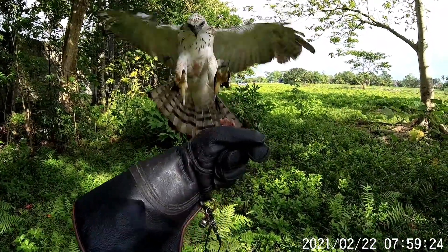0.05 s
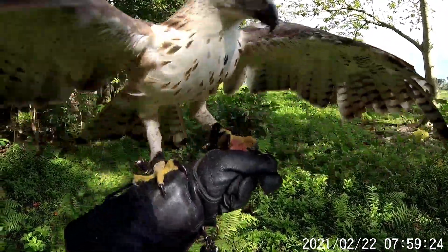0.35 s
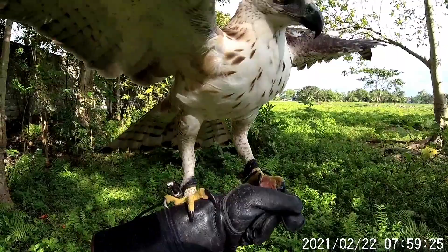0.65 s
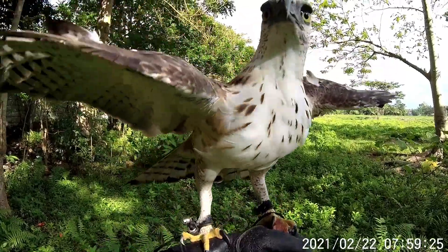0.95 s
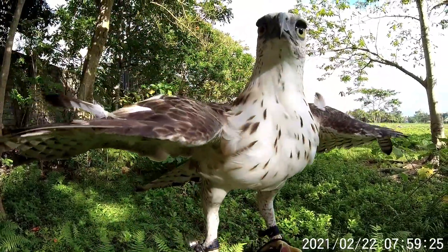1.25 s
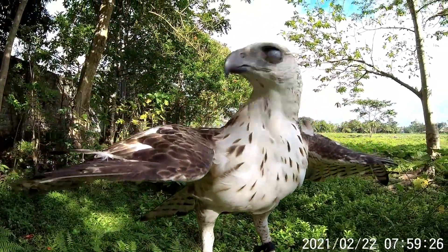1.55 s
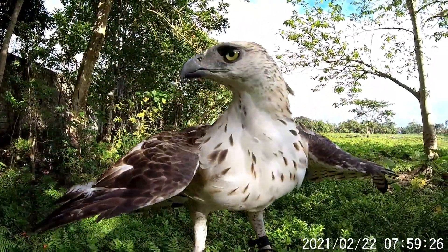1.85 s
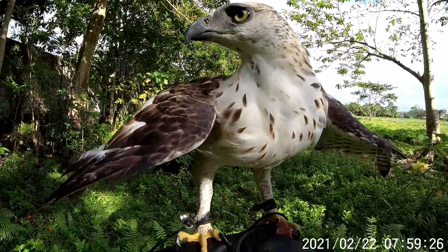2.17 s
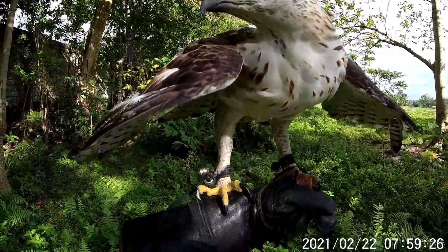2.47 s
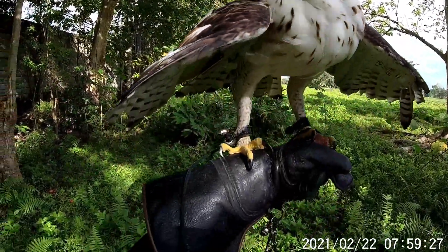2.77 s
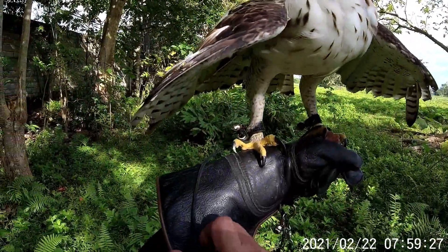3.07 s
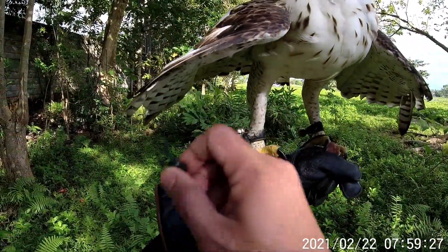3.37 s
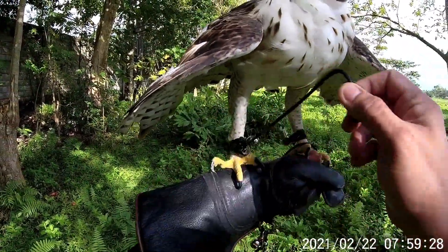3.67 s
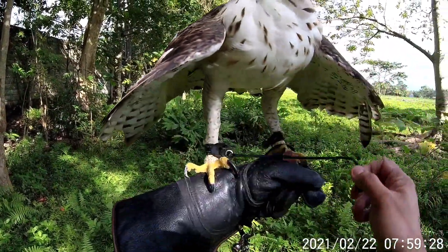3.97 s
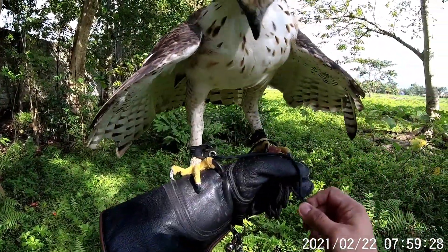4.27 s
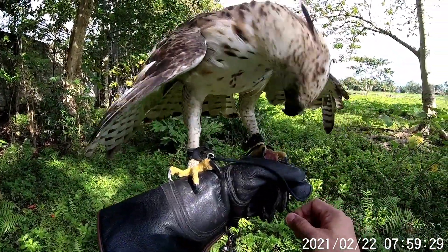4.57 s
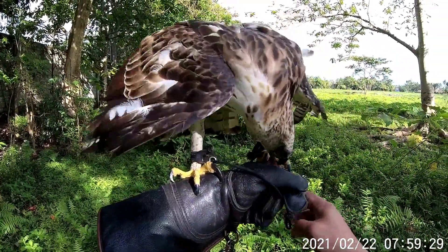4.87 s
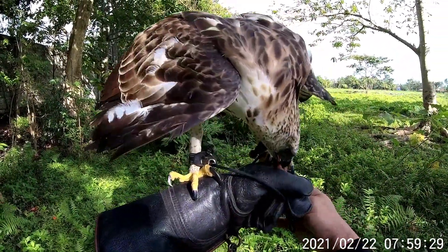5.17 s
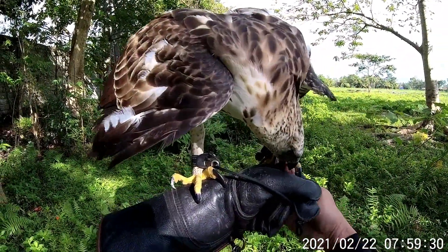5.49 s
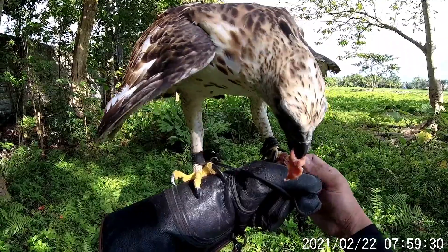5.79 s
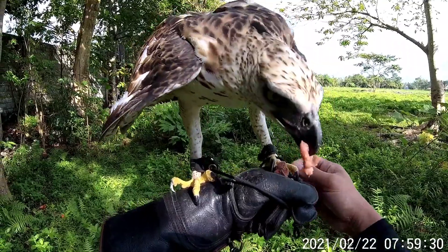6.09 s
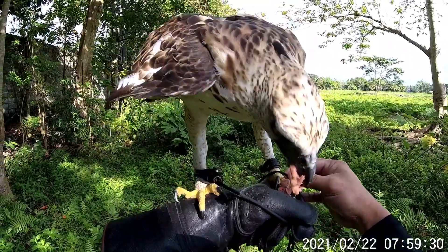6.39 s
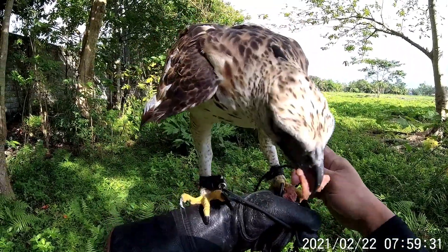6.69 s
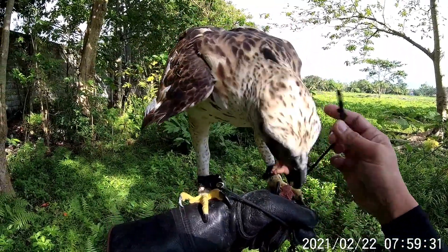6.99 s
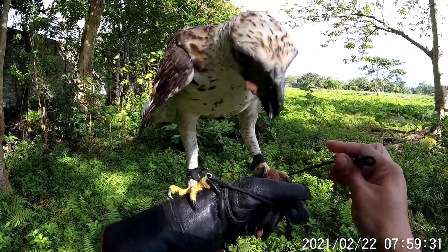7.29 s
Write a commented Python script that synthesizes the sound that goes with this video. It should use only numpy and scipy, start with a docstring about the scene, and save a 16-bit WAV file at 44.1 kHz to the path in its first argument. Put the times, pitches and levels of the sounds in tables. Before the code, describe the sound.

Small, high leg bells chatter close by from the start as an eagle lands on a leather glove. Feathers rustle, its feet make a quick cluster of dull, hollow knocks at about 0.2 seconds, and metal leash fittings clink. The jangling thins out by 1 second into sparse, soft ticks. A very faint, distant rooster crows from 0.6 to 1.8 seconds, and a songbird chips near 1.2 and 1.9. From about 3.1 to 4.3 seconds the bells jingle brightly again as the bird shifts its feet. Four faint, distant whistles follow between 4.1 and 5 seconds. From 5 to 7 seconds the beak gives a few small, sharp clicks as it takes food, with light swivel clinks and a soft shake of a bell. Throughout, distant engines drone low over the quiet field, with soft microphone hiss and a thin, high whine.

```python
"""Small bells chatter on a hawk-eagle's legs as it lands on a falconer's glove and shifts its feet.
Each blow of a loose clapper excites the modes of a metal shell, which then decay freely.
Feathers rustle, feet knock on the glove, a leash swivel clinks and the beak clicks as it takes food.
Songbirds and a rooster call far off, their sound scattered by trees, over the drone of engines.
The microphone adds hiss and a thin whine."""
import sys
import numpy as np
from scipy import signal
from scipy.fft import rfft, irfft, next_fast_len
from scipy.io import wavfile

SR = 44100
rng = np.random.default_rng(int(sys.argv[2]) if len(sys.argv) > 2 else 0)


def transcribe(u):
    """Save the signal u as a 16-bit wav file named by the first command-line argument.

    u: samples, shape (n,) or (channels, n), limited to [-1, 1]; the rate is SR.
    q: integer samples, one column per channel.
    """
    v = np.clip(np.atleast_2d(u).T, -1, 1)
    q = np.round(v * 32767).astype(np.int16)
    wavfile.write(sys.argv[1], SR, q)


N = 323694
T = np.arange(N) / SR

TWIN_HZ = (3950, 4099)  # the high bell's split main mode
# feet and wings striking the glove: (time [s], level [dB])
KNOCKS = [(0.182, -26), (0.19, -25), (0.198, -16), (0.202, -37), (0.221, -25), (0.456, -32.5), (0.723, -49)]


def amp(db):
    """Amplitude grows tenfold every 20 dB."""
    return 10 ** (np.asarray(db) / 20)


def unit_rms(x):
    """Normalisation to unit power."""
    return x / np.sqrt(np.mean(x ** 2) + 1e-20)


def curves(rows):
    """Linear interpolation of each column over time."""
    s, *columns = np.transpose(rows)
    return [np.interp(T, s, c) for c in columns]


def add(mix, s, sound):
    """Superposition: a sound joins the mix at time s."""
    part = mix[max(round(s * SR), 0):][:len(sound)]
    part += sound[:len(part)]


def noise(colour, size=N):
    """Spectral shaping: white noise takes a colour (frequency [Hz], level [dB]), at unit power."""
    hz, db = np.transpose(colour)
    f = np.fft.rfftfreq(size, 1 / SR) + 1
    gain = amp(np.interp(np.log(f), np.log(hz), db)) * np.minimum(f / hz[0], 1) ** 2
    return unit_rms(irfft(rfft(rng.standard_normal(size)) * gain, size))


def drift(rate_hz):
    """Random modulation: low-pass noise of unit power."""
    size = next_fast_len(N, real=True)
    f = np.fft.rfftfreq(size, 1 / SR)
    return unit_rms(irfft(rfft(rng.standard_normal(size)) * np.exp(-(f / rate_hz) ** 2), size)[:N])


def ring(times, db, t60, hz, bend, settle, rise):
    """A damped mode restarted by each strike; contact stiffness makes its pitch start sharp."""
    order = np.argsort(times)
    last = order[np.maximum(np.searchsorted(times[order], T, side="right") - 1, 0)]
    age = np.maximum(T - times[last], 0)  # since the latest strike
    level = amp(db[last] - 60 * age / t60) * (age > 0)
    pole = np.exp(-1 / (rise * SR))
    level = signal.lfilter([1 - pole], [1, -pole], level)
    sharp = (bend * rng.uniform(0.45, 1.5, len(times)))[last] * np.exp(-age / settle)
    return level * np.sin(2 * np.pi * (np.cumsum(hz * (1 + sharp)) / SR + rng.random()))


def chime(times, db, t60, hz, detune, rise=0.00049, size=8192):
    """Superposed decays of one mode, each in its own phase and slightly off pitch."""
    out, t = np.zeros(N), np.arange(size) / SR
    shape = amp(-60 * t / t60) * (1 - np.exp(-t / rise))
    for s, level, (off, phase) in zip(times, amp(db), rng.uniform(-0.89, 1, (len(times), 2))):
        add(out, s, level * shape * np.sin(2 * np.pi * (hz * (1 + detune * off) * t + phase)))
    return out


def bursts(blows, colour, t60, rise, size=4096):
    """Brief impacts have broad spectra: each gives a decaying puff of noise."""
    out, t = np.zeros(N), np.arange(size) / SR
    for s, db in blows:
        puff = noise(colour, size) * amp(-60 * t / t60) * (1 - np.exp(-t / rise))
        add(out, s, amp(db) * puff / abs(puff).max())
    return out


def rattle(bouts, gap_s, spread_db, count=1200):
    """A jittered impulse train: times and levels of a clapper's bounces in each bout."""
    jitter, luck = rng.uniform(-0.99, 1, (count, 2)).T
    times = gap_s * (np.arange(count) + jitter)
    inside = [(times >= start) & (times <= end) for start, end, _ in bouts]
    return (np.concatenate([times[i] for i in inside]),
            np.concatenate([db + spread_db * luck[i] for i, (*_, db) in zip(inside, bouts)]))


def trees(x, t60):
    """Scattering from trunks and leaves returns sparse, decaying echoes."""
    t = np.arange(SR // 2) / SR
    taps = rng.standard_normal(len(t)) * (rng.random(len(t)) < .05) * amp(-60 * t / t60) * (t > .004)
    return signal.fftconvolve(x, taps / np.linalg.norm(taps))[:N]


def background(hiss_db=-56.5, whine_hz=7607, whine_db=-59):
    """The noise floor: traffic rumble, the wash of the field and microphone self-noise add in power."""
    # spectra: (frequency [Hz], level [dB])
    rumble_colour = [(15, -36), (25, -31.5), (43, -12), (75, -1.5), (91, -4), (141, 0), (196, -4),
                     (246, -8), (333, -9.5), (414, -22.5), (520, -24), (680, -40), (1140, -120)]
    air_colour = [(200, 6), (450, -1.5), (800, -1), (1250, 0), (2000, -4), (3000, -9.5), (4500, -18),
                  (7000, -20), (11000, -45), (11800, -41)]
    hiss_colour = [(4000, -8.5), (7300, -13.5), (8000, -2.5), (8600, 2.5), (9400, -7.5), (11000, -9.5),
                   (11600, -30.5), (14500, -42)]
    # slow swells: (time [s], level [dB])
    rumble_swell = [(0, -39.5), (1.7, -40.5), (3.6, -41), (5.2, -37), (5.8, -39.5), (7.34, -40)]
    air_swell = [(0, -47.5), (1.5, -49.5), (2.2, -49.5), (3.5, -48.5), (4.7, -47), (5.7, -48.5),
                 (7.34, -47)]
    rumble = noise(rumble_colour) * amp(curves(rumble_swell)[0] - 1 + 1.5 * drift(3.8))
    air = noise(air_colour) * amp(curves(air_swell)[0] + 0.36 * drift(5.4))
    whine = amp(whine_db) * np.sqrt(2) * np.sin(2 * np.pi * whine_hz * T)
    return rumble + air + amp(hiss_db) * noise(hiss_colour) + whine


def engine(running, orders, waver=0.55, flutter_db=2):
    """Harmonics of an engine's cycle waver in level and phase as they cross the field."""
    hz, db = curves(running)
    phase = 2 * np.pi * np.cumsum(hz) / SR
    return np.sqrt(2) * sum(amp(db + order_db + flutter_db * drift(6))
                            * np.sin(k * phase + waver * drift(1.7)) for k, order_db in orders)


def traffic(engine_db=-2, tone_db=-1.5, fade_s=.15):
    """Periodic sources give line spectra: one engine idles, one throttles down, vehicles pass."""
    # engine speeds: (time [s], cycle rate [Hz], level [dB])
    idling = [(0, 47.6, -60), (.6, 47.57, -48), (1.5, 48, -46), (2.4, 48.64, -44), (3.6, 50.57, -42),
              (4.8, 48.86, -43), (6, 49.45, -45.5), (7, 50.93, -42), (7.34, 50.8, -49)]
    pulling = [(0, 31.73, -41), (.4, 31.84, -40), (1.1, 31.92, -39), (1.7, 32.1, -47), (2.35, 32.37, -42),
               (2.95, 32.46, -42.5), (3.2, 32.07, -49.5), (4, 29.8, -85)]
    # their harmonics: (order, level [dB])
    idling_orders = [(1, 0), (2, -0.5), (3, -2.5), (4, -9.5)]
    pulling_orders = [(5, -8.5), (6, 0.5), (7, -13.5), (10, -10.5), (11, -11.5), (12, -16.5)]
    # passing vehicles: (frequency [Hz], level [dB], start [s], end [s])
    drones = [(121.8, -41, 3.3, 3.96), (254, -47, 3.98, 4.03), (146, -37.5, 4.49, 4.95),
              (173.4, -43, 5.05, 5.63), (297, -51.5, 4.94, 5.37), (324, -49.5, 5, 5.4),
              (167, -41.5, 6.1, 6.2), (136.4, -42.5, 6.5, 8.1)]
    tones = np.zeros(N)
    for hz, db, start, end in drones:
        swell = np.clip(np.minimum(T - start, end - T) / fade_s + 1, 0, 1)
        tones += amp(db + 2 * drift(6.7)) * swell * np.sin(2 * np.pi * hz * T + 0.92 * drift(4.7))
    engines = engine(idling, idling_orders) + engine(pulling, pulling_orders)
    return amp(engine_db) * engines + amp(tone_db) * np.sqrt(2) * tones


def rooster(roughness=.045):
    """Pitch jitter makes the crow hoarse; only two harmonics carry across the field."""
    # (time [s], fundamental [Hz], level [dB])
    crow = [(.6, 612, -75), (.7, 600, -50), (.85, 627, -60), (1.05, 636.4, -52), (1.2, 657, -55),
            (1.3, 592, -50), (1.45, 559, -54), (1.65, 545, -55), (1.85, 560, -75)]
    hz, db = curves(crow)
    phase = 2 * np.pi * np.cumsum(hz * (1 + roughness * drift(60.4))) / SR
    sounding = (T > crow[0][0]) & (T < crow[-1][0])
    return sounding * amp(db) * (amp(-1) * np.sin(2 * phase) + amp(-4) * np.sin(3 * phase))


def birdsong(notes, contour, waver):
    """Frequency and amplitude modulation bend each pure note along one contour."""
    age, ratio, shape_db = np.transpose(contour)
    t, out = np.arange(0, age[-1], 1 / SR), np.zeros(N)
    wobble, flutter = drift(160), drift(70)
    taper = signal.windows.tukey(len(t), .15)
    for s, db, hz in notes:
        span = slice(round(s * SR), round(s * SR) + len(t))
        pitch = hz * np.interp(t, age, ratio) * (1 + waver * wobble[span])
        level = amp(db + np.interp(t, age, shape_db) + 2 * flutter[span]) * taper
        add(out, s, level * np.sin(2 * np.pi * np.cumsum(pitch) / SR))
    return out


def songbirds():
    """Arched whistles and falling chips from two birds arrive by direct and scattered paths."""
    # notes: (time [s], level [dB], reference pitch [Hz])
    whistle_notes = [(4.114, -51, 3400), (4.370, -44.5, 3340), (4.627, -44, 3350), (4.903, -46.5, 3310)]
    chip_notes = [(1.178, -40, 4000), (1.85, -45.5, 4056)]
    # contours: (time into the note [s], pitch ratio, level [dB])
    arch = [(0, .7, -5), (.01, .81, 2), (.02, .9, -1), (.031, 1, -8), (.041, .88, -1), (.052, .71, 1),
            (.064, .66, -2), (.078, .64, -8)]
    fall = [(0, 0.96, 5), (.008, 0.94, -2.5), (0.021, .925, -6), (.04, 0.93, 0)]
    whistles = amp(-0.5) * birdsong(whistle_notes, arch, waver=.03)
    chips = birdsong(chip_notes, fall, waver=0.0097)
    return whistles + amp(0.5) * chips + trees(whistles + chips, t60=0.36)


def beak(level_db=7):
    """Short, hard contacts of the beak give broadband clicks."""
    # (time [s], level [dB])
    clicks = [(5.083, -39), (5.2788, -39), (5.4134, -39), (5.959, -47), (6.6278, -36), (6.9914, -45)]
    # (frequency [Hz], level [dB])
    colour = [(1500, -31), (3500, -4), (5200, 6.5), (7000, 2), (10000, -17), (14500, -20)]
    return amp(level_db) * bursts(clicks, colour, t60=0.0065, rise=.0001)


def wing_effort(rise_s=0.0052, fade_db_per_s=190):
    """The envelope of the wing beats: each rises quickly, holds and decays exponentially."""
    # (time [s], duration [s], level [dB])
    beats = [(0, .015, -48), (.1, 0.079, -48), (0.183, .18, -41.5), (0.434, 0.088, -50), (0.598, .03, -53)]
    return sum(amp(db - fade_db_per_s * np.maximum(T - s - length, 0)) * np.clip((T - s) / rise_s, 0, 1)
               for s, length, db in beats)


def landing(rustle_db=2, scrape_db=-27, knock_db=-0.5):
    """Friction and impact: feathers rustle, talons scrape and the padded glove takes dull knocks."""
    # spectra: (frequency [Hz], level [dB])
    rustle_colour = [(300, 2), (900, 1), (1800, -17), (3600, 11.5), (6000, 1.5), (9000, -6.5), (13000, -3),
                     (14500, -26)]
    knock_colour = [(150, -10), (450, -15.5), (690, 4.5), (850, -11.5), (1100, -7), (1500, -19),
                    (2200, -13.5), (5000, -41)]
    scrape_colour = [(2200, -29), (2700, 0.5), (3300, -7), (3800, -3), (4300, -5), (5000, -34)]
    rustle = noise(rustle_colour) * amp(rustle_db + 3 * drift(120)) * wing_effort()
    grip = np.interp(T, [.192, .198, .228, .25], [0.007, 1, 0.71, 0.0013])
    scrape = noise(scrape_colour) * amp(scrape_db + 3 * drift(200)) * grip
    return rustle + scrape + amp(knock_db) * bursts(KNOCKS, knock_colour, t60=0.046, rise=.0016)


def glove(level_db=-10, growth=1.6):
    """A damped resonance of the gloved fist answers the harder knocks with a hollow note."""
    s, db = np.transpose(KNOCKS)
    note_db = db.max() + growth * (db - db.max()) + level_db
    return ring(s, note_db, t60=0.039, hz=700, bend=0.044, settle=0.0021, rise=0.0013)


def fittings(level_db=2.5, spread_db=4, count=9):
    """Random collisions excite rings and buckles at the landing, as hard as the wings beat."""
    # (frequency [Hz], level [dB], t60 [s])
    modes = [(5830, -3, .05), (6670, 0, 0.079), (9520, -2.5, .07), (10300, 4, 0.055), (12380, 5, .05),
             (12800, 1, .08), (14260, -3, .06)]
    out, effort_db = np.zeros(N), 20 * np.log10(wing_effort() + 1e-9)
    for hz, db, t60 in modes:
        times = rng.uniform(.18, .42, count)
        clash_db = np.interp(times, T, effort_db) + level_db + db + spread_db * rng.uniform(-1, 1, count)
        out += chime(times, clash_db, t60, hz, detune=0.0052)
    return out


def swivel(level_db=-3.5, t60=0.037):
    """Each clink of the leash swivel, and its weakening rebounds, excites inharmonic modes."""
    # (time [s], level [dB])
    clinks = [(.3472, -9.5), (0.3564, -8.5), (.3654, -12), (0.38, -19), (0.3908, -26), (0.4372, -35),
              (.4518, -31), (.5302, -27), (.6128, -21.5), (0.6228, -23.5), (.6364, -31), (1.8009, -44),
              (2.5381, -43), (5.3398, -43), (5.805, -23.5), (5.8481, -46), (6.0847, -43), (6.1623, -26.5),
              (6.573, -25.5), (6.975, -31)]
    # (delay [s], level [dB])
    bounces = [(0, 3), (.004, -5.5), (.008, -13), (0.014, -22)]
    # (frequency [Hz], level [dB], factor on t60)
    modes = [(4812, 0, 1), (5150, -14, .6), (9600, -29, 1), (12350, -23, .8)]
    s, db = np.transpose(clinks)
    delay, bounce_db = np.transpose(bounces)
    times = (s[:, None] + delay * rng.uniform(0.96, 1.2, (len(s), 1))).ravel()
    hit_db = (db[:, None] + bounce_db + level_db).ravel()
    pull = 1 + .014 * np.interp(T, [.4, .7], [0, 1]) * (1 + .7 * drift(19.8))  # taut leash raises pitch
    ringing = sum(ring(times, hit_db + mode_db, t60 * factor, hz * pull,
                       bend=0.013, settle=0.000715, rise=0.00033) for hz, mode_db, factor in modes)
    tick_db = hit_db - 5 + 3 * rng.standard_normal(len(times))
    return ringing + ring(times, tick_db, t60=0.0053, hz=5080, bend=.08, settle=.001, rise=0.00018)


def low_bell(level_db=-1, brightening=0.12, singing_hz=3204):
    """Modal excitation varies: each strike on the larger bell favours other modes; soft ones are dull."""
    # (time [s], level [dB], level of the singing mode [dB])
    strikes = [(0.197, -16.5, -33), (.201, -21.5, -45), (0.224, -28, -36), (.2334, -33, -50),
               (0.243, -24, -50), (0.296, -41, -27), (0.3558, -27, -38), (.368, -33, -28.5),
               (.4529, -33, -45), (0.466, -33, -55), (5.761, -42.5, -75), (6.0222, -48, -75),
               (6.0736, -42.5, -75)]
    # shaking from the landing and from tugging at food: (start [s], end [s], level [dB])
    rolls = [(.055, .11, -38), (.27, .41, -35), (.48, .53, -39), (5.66, 5.78, -53), (5.92, 6.1, -54),
             (6.82, 6.86, -56)]
    # (frequency [Hz], level [dB], t60 [s])
    modes = [(2787, -8.5, 0.17), (2885, -3, 0.13), (3700, -6.5, 0.064), (6520, -17, 0.12),
             (7380, -19, 0.16), (10400, -29, .08), (12000, -16, 0.05), (12430, -9, .05), (12800, -14, .09),
             (14130, -24, .07)]
    clear_s, clear_db, singing_db = np.transpose(strikes)
    s, db = np.hstack([(clear_s, clear_db), rattle(rolls, gap_s=0.025, spread_db=3)])
    tilt = brightening * np.log([hz / modes[0][0] for hz, *_ in modes])
    colour_db = 3 * rng.standard_normal((len(s), len(modes))) + np.outer(db - db.max(), tilt)
    jangle = sum(chime(s, db + level_db + mode_db + offset_db, t60, hz, detune=0.0078, rise=0.0005)
                 for (hz, mode_db, t60), offset_db in zip(modes, colour_db.T))
    return jangle + chime(clear_s, singing_db, t60=0.17, hz=singing_hz, detune=.001, rise=.0019)


def sheen_overtones(s, db, growth=0.89, firm_strike_db=-20):
    """Weak shell modes give the high bell a thin, high shimmer, which follows the strike's force."""
    # (frequency [Hz], level at a firm strike [dB], t60 [s])
    modes = [(10436, -49.5, 0.16), (13800, -73, .046)]
    luck_db = 3 * rng.standard_normal((len(s), len(modes)))
    return sum(chime(s, mode_db + growth * (db - firm_strike_db) + luck, t60, hz, detune=0.0013)
               for (hz, mode_db, t60), luck in zip(modes, luck_db.T))


def rolling_clapper(twin_db=-11, overtone_db=-12):
    """Rolling contact ticks on the high bell's shell; the gentler the motion, the fewer the ticks."""
    # the bird shifts its weight: (start [s], end [s], level [dB])
    rolls = [(.015, .035, -24), (.08, .135, -27), (.16, .245, -28), (.33, .405, -24), (.44, .56, -31),
             (.59, .69, -30), (.735, .76, -34), (.95, 1.0, -39), (1.1, 1.135, -34), (1.275, 1.31, -41),
             (1.44, 1.47, -45.5), (1.52, 1.55, -47), (1.63, 1.72, -43.5), (1.77, 1.8, -44.5),
             (2.03, 2.16, -47.5), (2.2, 2.31, -39), (2.35, 2.41, -40.5), (2.44, 2.49, -44),
             (2.85, 3.13, -47), (3.175, 3.225, -32.5), (3.36, 3.41, -27), (3.48, 3.62, -41.5),
             (3.68, 3.72, -35.5), (3.75, 3.86, -34), (3.97, 4.02, -34.5), (4.11, 4.32, -42.5)]
    s, db = rattle(rolls, gap_s=.013, spread_db=4)
    touches = rng.random(len(s)) < np.interp(db, [-50, -32], [.3, 1])
    s, db = s[touches], db[touches]
    ticks = ring(s, db, t60=0.025, hz=4190, bend=0.04, settle=0.0022, rise=0.00069)
    hum = sum(chime(s, db + twin_db, t60=0.07, hz=hz, detune=0.0055, rise=.0015) for hz in TWIN_HZ)
    return ticks + hum + amp(overtone_db) * sheen_overtones(s, db)


def clapper_contacts(s, db, spread_db=2):
    """Contact stiffness: a brief higher note falls toward the main mode, then the clapper rebounds."""
    blow_db, rebound_db = db + spread_db * rng.standard_normal((len(s), 2)).T
    rebound_s = s + rng.uniform(0.0016, 0.0064, len(s))
    blow = ring(s, blow_db - 7, t60=.02, hz=4220, bend=.11, settle=.0012, rise=.0011)
    rebound = ring(rebound_s, rebound_db - 12, t60=0.016, hz=4270, bend=.074, settle=.0019, rise=.00092)
    return blow + rebound


def high_bell(main_db=-1, tick_db=-16):
    """Mode splitting: a slit divides the struck shell's main mode into twins that beat together."""
    # (time [s], level [dB], lower twin's power share, t60 [s], low overtones [dB], high overtones [dB])
    strikes = [ (.01, -20.5, 0.13, 0.088, -66, -47), (0.0728, -26, 0.3, 0.11, -54, -47),
               (.0957, -14, 0, .045, -50, -52), (.105, -13, 0.04, .02, -49, -51),
               (0.1136, -6.5, 0.02, 0.049, -53, -33), (.1425, -19.5, 0.079, 0.07, -55, -36),
               (0.175, -21, .1, .06, -50, -42), (0.187, -16, 0, 0.037, -45, -50),
               (.199, -15, 1, .03, -49, -48), (.2132, -17, 1, .04, -50, -52),
               (.231, -13, 0.28, 0.023, -40, -45), (0.283, -13.5, 0.14, .11, -33, -45),
               (0.3018, -6, 0, .067, -44, -30), (0.31, -13, 0, 0.088, -53, -42),
               (0.3232, -11.5, 0.4, 0.047, -50, -52), (.3562, -16.5, 0, .04, -36, -33),
               (.378, -16.5, 0.12, .045, -50, -35), (0.389, -15.5, 1, 0.047, -51, -51),
               (.4317, -21.5, 0.1, .08, -58, -63), (0.46, -18, 1, 0.17, -43, -49),
               (.4712, -16, 1, .16, -51, -44), (.4931, -12, 1, .08, -52, -42),
               (.5108, -16.5, 0, .064, -47, -48), (.5288, -22.5, 0.067, 0.13, -47, -54),
               (0.5791, -10, 0.04, 0.056, -53, -41), (.6055, -18.5, .5, 0.064, -55, -51),
               (.667, -24, 1, 0.076, -53, -44), (0.696, -26, 0, .07, -61, -50),
               (.7111, -17.5, 0, 0.059, -57, -56), (0.7716, -32, .3, 0.019, -72, -80),
               (.8568, -37, 0, .02, -76, -80), (0.9047, -25.5, 0.75, 0.055, -56, -57),
               (1.056, -32.5, .3, 0.024, -69, -67), (1.0815, -33, 0.7, 0.053, -65, -67),
               (1.1166, -30.5, 0.4, .018, -75, -78), (2.2333, -28.5, 0, 0.029, -78, -79.5),
               (2.301, -35, .15, .03, -68, -72), (2.6778, -35.5, 0, .025, -77, -82),
               (2.7534, -38, 0.06, .018, -70, -80), (3.153, -28, 0.1, .027, -62, -69),
               (3.1976, -20.5, 0.25, 0.053, -48, -44), (3.2606, -23.5, 0.7, .08, -49, -55),
               (3.2773, -10.5, 0.2, 0.048, -36, -46), (3.3513, -24.5, 0.2, .044, -54, -42),
               (3.369, -24, 0.37, 0.052, -56, -39), (3.388, -21, 0.14, .022, -39.5, -50),
               (3.404, -25, 0.3, .035, -52, -62), (3.543, -30, 0, .033, -66, -58),
               (3.5575, -26, 0.1, 0.054, -58, -36.5), (3.575, -32, 0.5, 0.074, -58, -36),
               (3.6255, -13.5, 0.06, 0.046, -46, -30.5), (3.639, -14.5, 0.25, 0.022, -62, -50),
               (3.6677, -22, .2, 0.046, -49, -58), (3.68, -20.5, 0.2, .03, -53, -43),
               (3.743, -29, 0, .033, -58, -50), (3.7613, -26, 1, 0.12, -60, -60),
               (3.799, -23, 0.2, .07, -54, -38), (3.845, -24.5, 0, 0.069, -62, -61),
               (3.866, -17, 0.9, 0.089, -48, -46), (3.8827, -11, 0.06, .035, -54, -33),
               (3.8882, -18, 0.95, 0.15, -39, -42), (3.9118, -17.5, .7, .05, -47, -47),
               (3.9186, -17, .05, 0.047, -47, -48), (3.9719, -26.5, 0.1, 0.049, -61, -58),
               (3.995, -18, 0.98, 0.052, -53, -45), (4.026, -26, 0.2, .04, -63, -59),
               (4.1667, -26, 0.6, 0.082, -61, -53), (4.195, -18.5, 0, 0.04, -62, -49),
               (4.2335, -22, .5, 0.043, -63, -58)]
    # (frequency [Hz], level [dB], t60 [s])
    low_overtones = [(7093, 0, 0.16), (7380, -6, 0.15)]
    high_overtones = [(11380, 2.5, 0.12), (12400, -20, .05), (13620, -22, .05)]
    s, db, share, t60, low_db, high_db = np.transpose(strikes)
    share = np.clip(share, .01, .99)
    latest_t60 = t60[np.maximum(np.searchsorted(s, T, side="right") - 1, 0)]
    out = clapper_contacts(s, db) + sheen_overtones(s, db)
    for hz, part in zip(TWIN_HZ, (share, 1 - share)):
        twin_db = db + main_db + 10 * np.log10(part)
        out += ring(s, twin_db, latest_t60, hz, bend=0.01775, settle=0.001022, rise=0.00097)
    for modes, level_db in ((low_overtones, low_db), (high_overtones, high_db)):
        for hz, mode_db, decay in modes:
            out += chime(s, level_db + mode_db, decay, hz, detune=0.0022)
    # the tick grows faster than the ring, so only hard blows show it
    ticks = zip(s, db.max() + 1.7 * (db - db.max()))
    tick_colour = [(2500, -21), (3500, -29), (4600, 0), (6000, -6.5),
                   (9000, -16.5), (13500, -12), (14700, -26)]
    return out + amp(tick_db) * bursts(ticks, tick_colour, t60=0.018, rise=.0001)


def scene():
    """Direct sound dominates near by, scattered sound far off; both channels are alike."""
    bells = high_bell() + rolling_clapper() + low_bell()
    near = bells + swivel() + landing() + fittings() + glove() + beak()
    far = songbirds() + trees(rooster(), t60=0.23)
    mix = near + amp(-19) * trees(near, t60=0.28) + far + traffic() + background()
    return np.array([mix, mix])


def record(dry):
    """Band limiting: a low-pass filter removes the highest treble."""
    low_pass = signal.firwin(511, cutoff=14600, window=("kaiser", 9), fs=SR)
    return signal.oaconvolve(dry, low_pass[None], "same")


dry = scene()
out = record(dry)
transcribe(out)
```